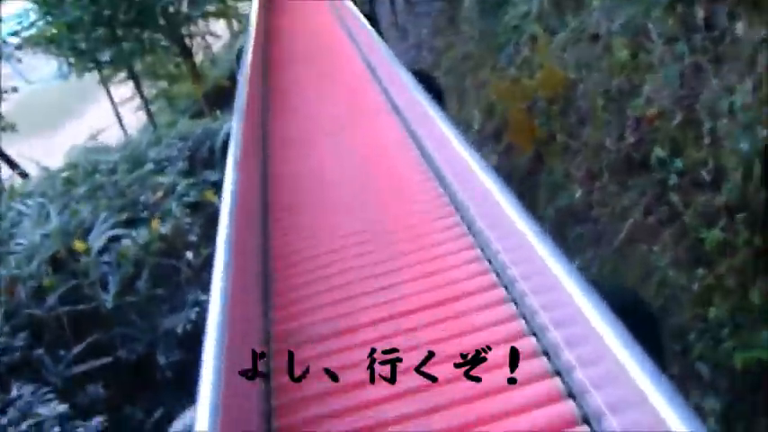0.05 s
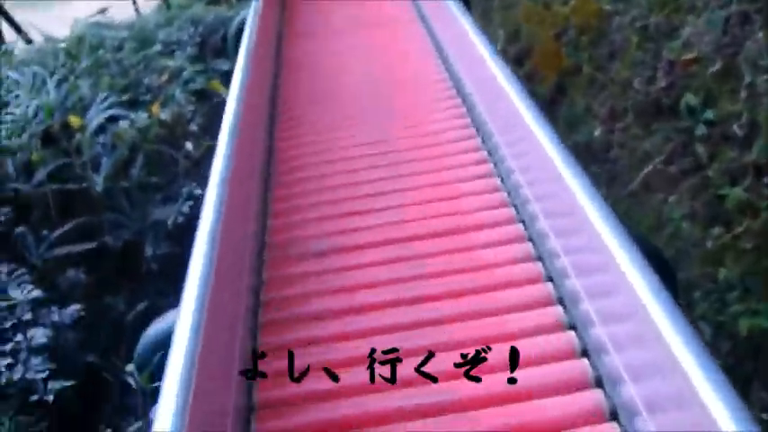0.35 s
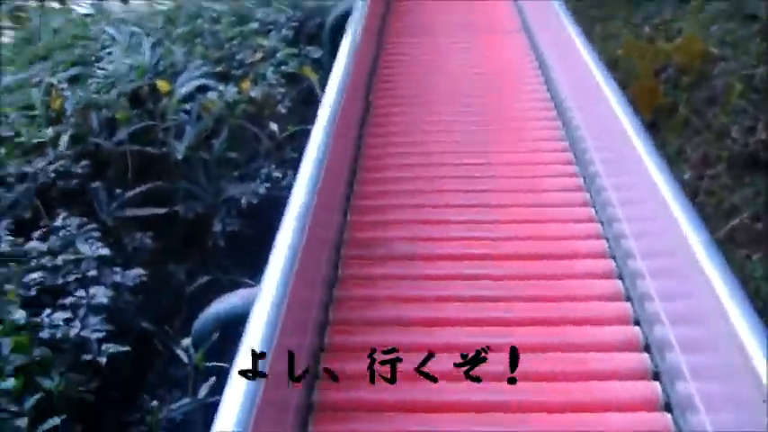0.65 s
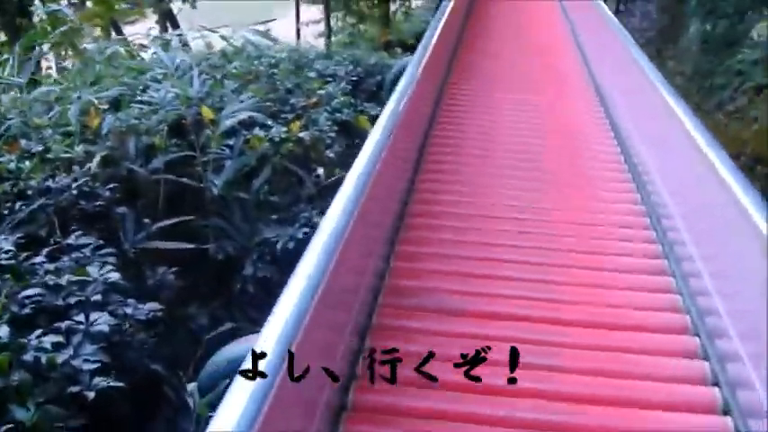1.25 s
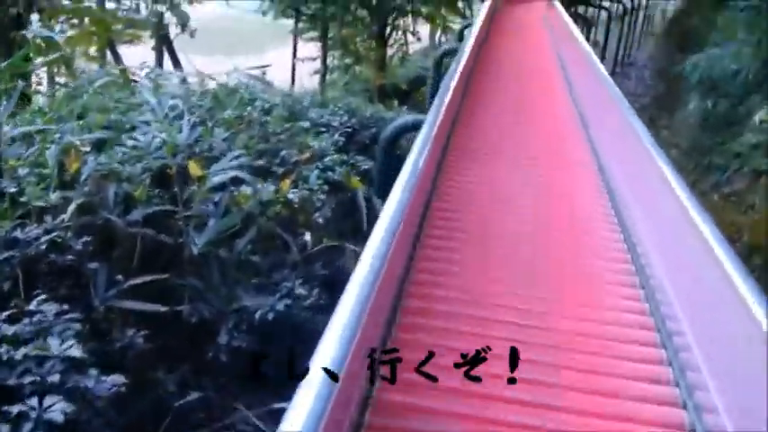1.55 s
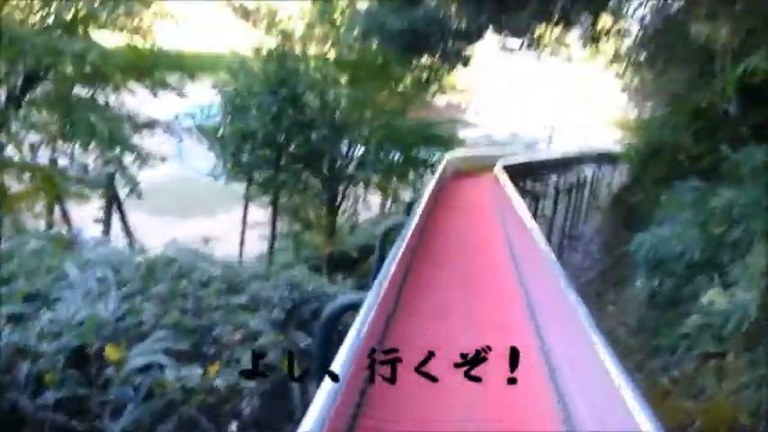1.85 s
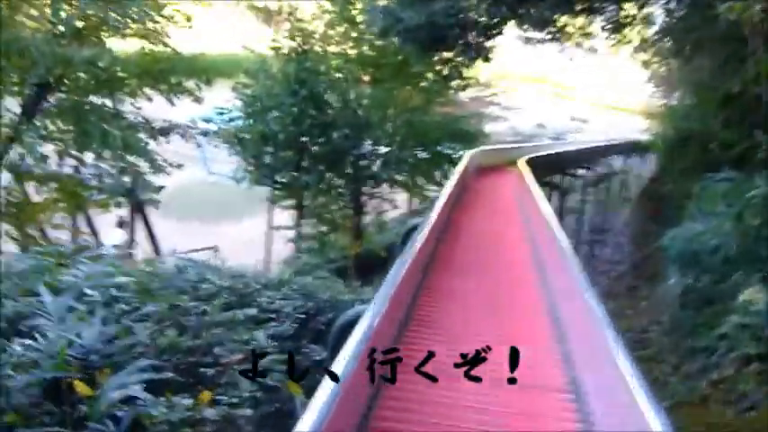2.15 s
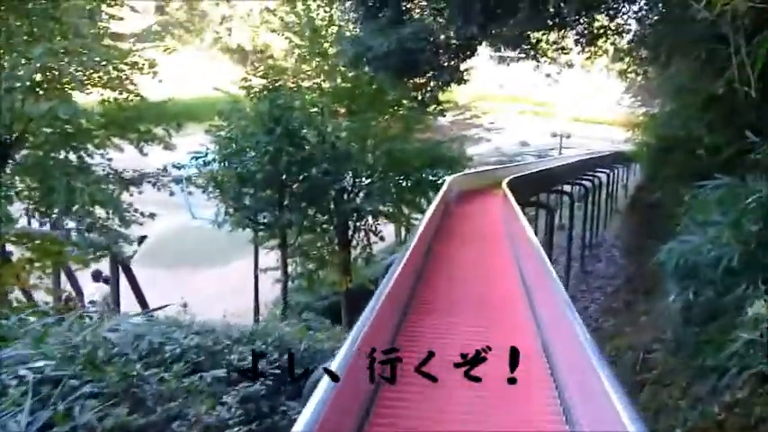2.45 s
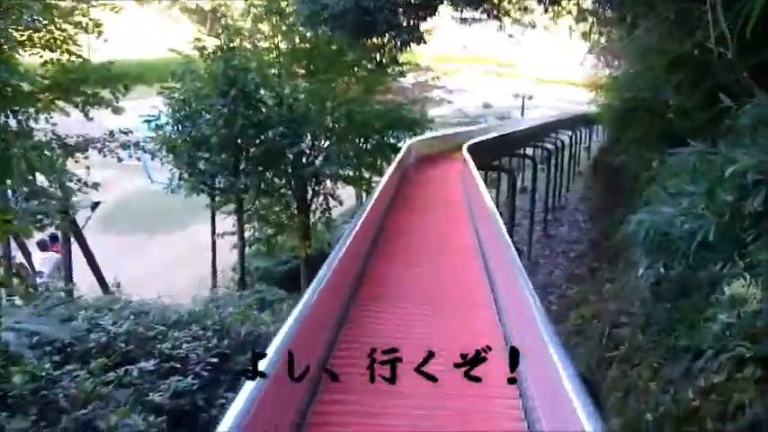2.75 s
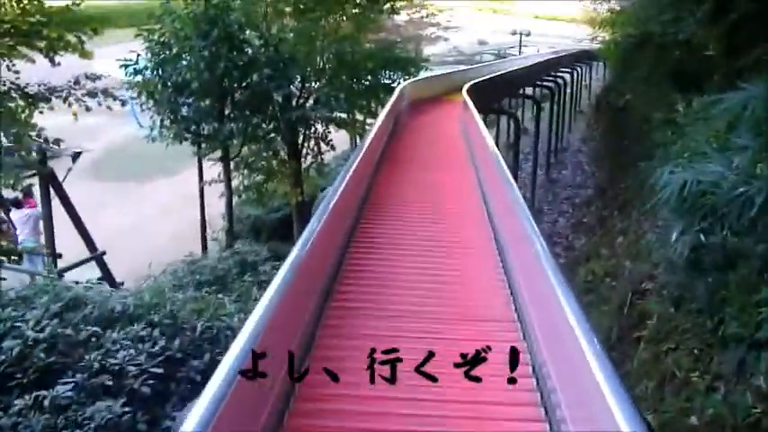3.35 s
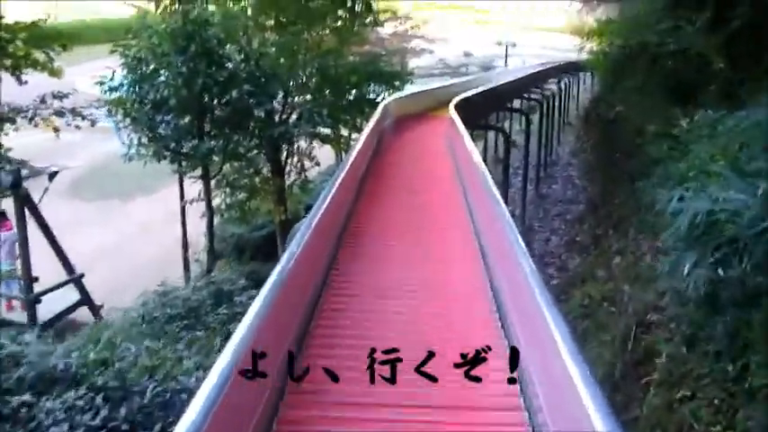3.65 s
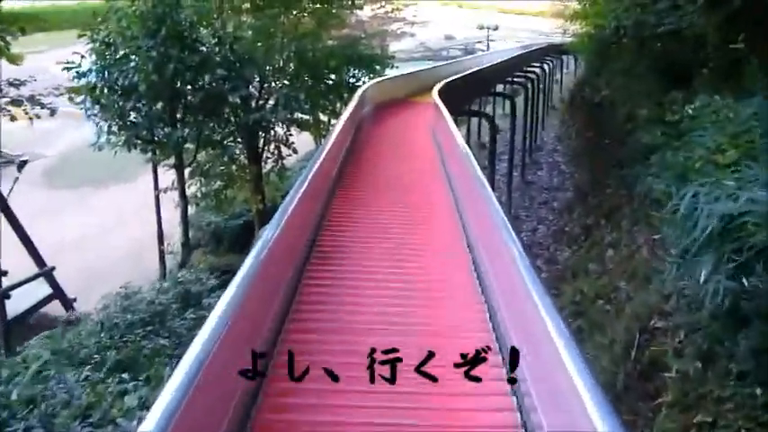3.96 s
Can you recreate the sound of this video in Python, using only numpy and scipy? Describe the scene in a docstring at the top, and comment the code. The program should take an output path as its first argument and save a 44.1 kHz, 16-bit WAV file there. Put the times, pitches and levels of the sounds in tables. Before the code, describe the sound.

Loose rollers on a long outdoor slide tick and scrape softly, then spin up under a rider into a loud, steady rumbling chatter. Thumps and sharp clacks cut through, all heard from right above the rollers.

```python
"""Roller slide, close up

A rider shoves off on a long roller slide, gathers speed and coasts, the microphone close to the rollers.
Loose rollers chatter on their axles: hollow rumble in the tubes, rattle in the steel frame, bearing fizz.
Shoves and bumps make the chatter surge; single rollers knock hard. Faint outdoor air lies underneath."""
import sys
import numpy as np
from scipy import signal
from scipy.fft import rfft, irfft, next_fast_len
from scipy.io import wavfile
from scipy.ndimage import uniform_filter1d, minimum_filter1d, map_coordinates

SR = 44100
rng = np.random.default_rng(int(sys.argv[2]) if len(sys.argv) > 2 else 0)


def dump_mix(stems):
    """Bounce the given channels to the path in sys.argv[1] as a 16-bit WAV at rate SR."""
    frames = np.atleast_2d(stems).T  # one column per channel
    limited = np.clip(frames, -1, 1)  # hard clip at full scale
    pcm = np.round(limited * 32767).astype(np.int16)
    wavfile.write(sys.argv[1], SR, pcm)


N = 176400

# Steady rolling. Each row: time in seconds, then relative rumble, rattle and fizz in dB.
ROLLING = [(0, -51, -42.5, -51.5), (.35, -73, -66, -74), (.395, -61, -74, -67), (.43, -48, -44, -59),
           (.57, -49, -47.5, -47), (.72, -50.5, -47, -55), (0.819, -50, -39, -39), (.91, -45, -41, -46),
           (1.03, -39, -40, -54), (1.12, -45.5, -45, -51), (1.2, -43.5, -34.5, -39),
           (1.29, -36.5, -32.5, -34.5), (1.38, -33.5, -34.5, -37.5), (1.45, -30.5, -25.5, -26.5),
           (1.52, -30, -28.5, -32), (1.57, -23.5, -24, -26), (1.68, -25.5, -22, -26.5),
           (1.76, -23.5, -26, -28), (1.97, -24, -24, -31), (2.14, -25, -27, -32.5),
           (2.2, -25.5, -24.5, -29.5), (2.34, -24, -22, -26), (2.44, -23, -26, -30.5),
           (2.52, -22, -23, -29), (2.66, -24.5, -24.5, -30), (2.86, -22.5, -23, -29),
           (3.04, -24.5, -24.5, -26.5), (3.16, -24.5, -26, -29), (3.31, -23.5, -23, -26.5),
           (3.6, -22, -21, -26), (3.7, -24.5, -26, -29), (3.78, -23, -24, -28), (3.835, -25, -27, -29.5),
           (3.88, -25, -23.5, -29.5), (4, -20, -24.5, -26.5)]
# Shoves and bumps. Each row: peak time and length in seconds, then relative rumble, rattle, fizz in dB.
SURGES = [(0.266, 0.0089, -57, -39.5, -54), (0.417, 0.0045, -37, -43, -52), (0.451, 0.018, -46, -41, -44.5),
          (0.504, 0.015, -42, -39, -33), (0.6, 0.014, -40.5, -30.5, -37.5), (0.738, 0.033, -58, -43, -35.5),
          (0.787, 0.018, -37, -35.5, -37.5), (0.845, 0.025, -36, -30, -35), (0.968, 0.023, -36, -34, -36),
          (1.28, 0.016, -40, -36, -44), (1.427, 0.013, -46, -42, -26), (1.486, 0.0056, -24, -20.5, -24),
          (1.545, 0.012, -22, -22.5, -21), (1.604, 0.0079, -24, -32, -20), (1.665, 0.03, -22.5, -34, -22.5),
          (1.714, 0.0063, -18, -21, -19.5), (1.827, 0.0099, -21, -30, -22.5), (1.888, 0.022, -23, -24, -24),
          (1.974, .015, -25, -26, -27), (2.028, 0.044, -32, -24, -28.5), (2.098, 0.013, -24, -24, -23.5),
          (2.181, 0.03, -28, -26, -30.5), (2.301, 0.013, -20, -38, -25.5), (2.467, 0.015, -26, -23.5, -29),
          (2.943, 0.0052, -24, -40, -26), (3.011, 0.0059, -28, -41, -19.5),
          (3.085, 0.04, -24.5, -22.5, -30), (3.124, 0.0062, -20, -15, -19),
          (3.203, 0.0076, -38, -17.5, -26), (3.182, .006, -40, -22, -22.5), (3.301, 0.021, -22.5, -28, -23),
          (3.406, 0.033, -34.5, -28, -26.5), (3.493, 0.0059, -27, -25, -23.5),
          (3.54, 0.0065, -28, -40, -52), (3.759, 0.0061, -23, -49, -50), (3.248, 0.0073, -25, -33, -26),
          (3.96, 0.0047, -34, -36, -39)]
# Resonances of the slide's parts. Each row: centre in Hz, width in Hz, level in dB.
TUBE_MODES = [(157.3, 20, -15.5), (251, 31.4, -4), (271.6, 33, -0.5), (306.5, 57, -3), (360, 133, -6.5),
              (459, 65, -3)]
FRAME_MODES = [(780, 134, 0.5), (990, 186, -3.5), (1232, 148, 1), (1700, 170, -8.5), (2085, 160, 0),
               (2330, 58, -33)]
AXLE_MODES = [(2990, 320, 0.5), (3223, 200, 1.5), (4004, 214, 2.5), (4710, 630, -5.5), (5370, 210, -4.5),
              (5860, 400, -6.5)]
# Broad colour under those resonances. Each row: frequency in Hz, level in dB.
RUMBLE_BED = [(25, -51), (55, -69), (80, -39), (115, -27), (200, -14.5), (400, -12), (600, -15.5),
              (900, -15.5), (2000, -69)]
RATTLE_BED = [(150, -75.5), (450, -12.5), (700, -8.5), (1500, -5), (2400, -12.5), (3200, -12), (6000, -70)]
FIZZ_BED = [(1000, -39), (2200, -2), (2800, -0.5), (5000, -2.5), (7000, -5), (8500, -10), (10000, -16),
            (11500, -26.5)]
# Colour of the outdoor air and of a clack. Each row: frequency in Hz, level in dB.
AIR_COLOUR = [(25, -58), (90, -8.5), (250, -1.5), (500, 4.5), (900, 2), (1800, 3.5), (3000, -0.5),
              (6000, -13), (11000, -16.5)]
CLACK_COLOUR = [(100, -48), (500, -17), (1200, -1), (3500, -1.5), (7000, -6.5), (11000, -11.5)]
# Sharp dry clacks. Each row: start in seconds, relative level in dB, t60 in seconds.
CLACKS = [(0.0275, -20, 0.009), (0.031, -4.5, 0.0082), (0.2605, -25, 0.046), (0.407, -29, 0.027),
          (0.4367, -19, .012), (0.4969, -7.5, 0.011), (.506, -24, .008), (.598, -19, .007),
          (0.6422, -14, 0.013), (0.6474, -15, 0.0082), (0.6748, -17, 0.0087), (1.045, -27, .01),
          (1.223, -29, 0.0064), (1.362, -31, 0.007), (1.547, -13, .014), (1.833, -5, .014),
          (1.887, -10, .012), (1.905, -7, 0.013), (2.293, -15, .014), (2.768, -14, .008), (2.94, -5, .012),
          (2.955, -8, .01), (3.126, -12, .012), (3.206, -2, .012)]
# The rider's weight drops on a tube. Each row: start in seconds, relative level in dB, pitch in Hz.
THUMPS = [(0.367, -32, 310), (0.783, -26, 300), (0.979, -25, 333), (1.452, -6, 284), (1.484, -6, 300),
          (1.823, -11, 293), (1.878, -6, 285), (2.094, -3, 297), (2.163, -6, 291), (3.203, -3, 275)]
# Ringing scrapes. Each row: peak time and length in seconds, centre and width in Hz, level in dB.
SCRAPES = [(0.413, 0.007, 8900, 4000, -39.5), (0.449, 0.021, 8100, 4000, -39.5),
           (0.792, 0.023, 4670, 1500, -34.5), (0.839, 0.018, 960, 350, -31),
           (0.854, 0.022, 2390, 1500, -34.5), (0.985, 0.01, 2100, 300, -33), (0.993, 0.065, 1270, 150, -42),
           (1.09, 0.042, 1470, 90, -48), (1.272, 0.054, 2100, 450, -29), (1.286, 0.022, 5500, 6000, -40.5),
           (1.431, 0.035, 3120, 500, -28), (1.667, 0.054, 3330, 700, -38), (1.68, 0.068, 1230, 250, -26.5),
           (1.909, 0.02, 9600, 900, -38), (2.387, 0.01, 7000, 4000, -31), (3.075, .012, 5770, 900, -26),
           (3.606, 0.0062, 6500, 1800, -25), (3.852, 0.0043, 6260, 1500, -22.5)]
# Hard knocks of one roller. Each row: start in seconds, relative level in dB, pitch factor.
KNOCKS = [(.6485, -22.5, 1.25), (1.222, -14.5, 1.41), (1.305, -18, 1.45), (1.361, -17, 1.4),
          (1.715, -7, 0.97), (1.724, -11, 1.44), (1.829, -7, 1.27), (1.888, -7.5, 1.15),
          (1.974, -6.5, 1.14), (2.066, -12.5, 1.4), (2.17, -10, 0.8), (2.351, -16, 0.87),
          (2.488, -13, 0.91), (3.05, -10.5, 1.44), (3.096, -11, 1.35), (3.1255, -3, 0.95),
          (3.209, -10.5, 0.95), (3.238, -8.5, 0.99), (3.433, -8, 1.04), (3.546, -8, 1.47),
          (3.668, -1, 1.014), (3.718, -13, 0.97), (3.8087, -0.5, 1.026), (3.8875, -11.5, 1.5),
          (3.947, -7.5, 1)]
# A knocked roller's ring. Each row: base pitch in Hz, level in dB, t60 of a full ring in seconds.
KNOCK_MODES = [(772, -5.5, 0.037), (834, 4.5, 0.036), (1032, -9.5, 0.017), (1327, -8, 0.037),
               (1910, -5, 0.02), (2077, -5.5, 0.019)]

RUMBLE, RATTLE, FIZZ = range(3)  # order of the level columns in ROLLING and SURGES


def amp(db):
    """Decibels to gain."""
    return 10 ** (np.asarray(db) / 20)


def unit(x):
    """Scale to rms 1."""
    return x / np.sqrt(np.mean(x ** 2) + 1e-20)


def steady(x, window):
    """Hold the rms near 1 over a sliding window of samples."""
    return x / np.sqrt(np.abs(uniform_filter1d(x ** 2, window)) + 1e-12)


def colour(points, f):
    """Gain of (Hz, dB) points on a log axis."""
    hz, db = np.transpose(points)
    return amp(np.interp(np.log(f + 1), np.log(hz), db))


def resonance(hz, width, db, f):
    """Gain of one steep-sided resonance."""
    detuning = (hz * hz - f * f) / (1.5 * width * (f + 1))
    return amp(db) / (1 + detuning ** 2)


def filtered(x, response):
    """Shape x by a gain over frequency."""
    size = next_fast_len(N + SR // 2)
    return irfft(rfft(x, size) * response(np.fft.rfftfreq(size, 1 / SR)), size)[:N]


def impulse_response(gain, size=4096):
    """Causal ringing of a body with the given gain over frequency."""
    cepstrum = irfft(np.log(gain(np.fft.rfftfreq(size, 1 / SR)) + 1e-5))
    cepstrum[1:size // 2] *= 2  # fold to minimum phase
    cepstrum[size // 2 + 1:] = 0
    return irfft(np.exp(rfft(cepstrum)))


def wobble(knots_per_s):
    """A smooth random curve."""
    knots = rng.standard_normal(4000)
    return map_coordinates(knots, [np.arange(N) * knots_per_s / SR], mode="mirror")


def add(track, start, sound):
    """Mix a sound in at a start in seconds."""
    i = max(0, round(start * SR))
    track[i:i + len(sound)] += sound[:max(0, N - i)]


def outdoor_air(level_db=-45.5):
    """Faint, even noise of the open air around the slide."""
    return amp(level_db) * unit(filtered(rng.standard_normal(N), lambda f: colour(AIR_COLOUR, f)))


def load(part, rise=.55, fall=1.05):
    """Strength of one part: steady rolling plus surges that swell quickly and ebb more slowly."""
    t, rolling = np.arange(N) / SR, np.array(ROLLING)
    power = amp(np.interp(t, rolling[:, 0], rolling[:, part + 1])) ** 2
    for peak, length, *db in SURGES:
        width = length * np.where(t < peak, rise, fall)
        power += amp(db[part]) ** 2 * np.exp(-((t - peak) / width) ** 2)
    return np.sqrt(power)


def chatter(modes, bed, contacts_per_s, spread_db, sway_db):
    """Tiny uneven impacts ring one part; its resonances take turns as new rollers come under load."""
    def ring(gain):
        hits = (rng.random(N) < contacts_per_s / SR) * rng.choice([-1, 1], N)
        sizes = amp(spread_db * rng.standard_normal(N))
        return signal.oaconvolve(steady(hits * sizes, SR // 25), impulse_response(gain))[:N]

    body = ring(lambda f: colour(bed, f))
    for mode in modes:
        body += ring(lambda f: resonance(*mode, f)) * unit(amp(sway_db * wobble(knots_per_s=32)))
    return steady(body, SR // 24)


def rollers(rumble_db=-1.06, full_speed_s=1.23, bright_db=12, bright_hz=9000, flutter_db=0.86):
    """Tubes, frame and bearings shake under the rider's uneven load."""
    tubes = chatter(TUBE_MODES, RUMBLE_BED, contacts_per_s=1500, spread_db=3.5, sway_db=1.2)
    frame = chatter(FRAME_MODES, RATTLE_BED, contacts_per_s=1500, spread_db=2.5, sway_db=2.8)
    bearings = chatter(AXLE_MODES, FIZZ_BED, contacts_per_s=3800, spread_db=3, sway_db=3.2)
    rumble = amp(rumble_db) * load(RUMBLE) * tubes
    rattle = load(RATTLE) * frame
    fizz = load(FIZZ) * bearings
    # Slow, light scuffs are brighter than full rolling.
    slow = np.clip(1 - np.arange(N) / SR / full_speed_s, 0, 1)
    fizz += slow * amp(bright_db) * filtered(fizz, lambda f: f ** 6 / (f ** 6 + bright_hz ** 6))
    return (rumble + rattle + fizz) * amp(flutter_db * wobble(knots_per_s=51))


def axle_ticks(per_s=110, low_hz=2845, high_hz=7180, t60=.011, range_db=19, loss_db=8, level_db=-11.5):
    """Loose axles tick in clusters of three bounces, each cluster at its own pitch, louder under load."""
    out, t = np.zeros(N), np.arange(SR // 40) / SR
    for when, pitch, size, pace in rng.random((int(per_s * N / SR), 4)):
        hz = low_hz * (high_hz / low_hz) ** pitch
        gap_s = .003 + .006 * pace
        for bounce in range(3):
            phase_drift = .14 * np.cumsum(rng.standard_normal(len(t)))
            fade = amp(range_db * size - loss_db * bounce - 60 * t / t60)
            add(out, when * N / SR + bounce * gap_s, fade * np.sin(2 * np.pi * hz * t + phase_drift))
    return amp(level_db) * load(FIZZ) * unit(out)


def tube_boom(hz, attack_s=0.0071, t60=0.085):
    """A hollow tube booms briefly under one soft blow."""
    t = np.arange(SR // 8) / SR
    fade = amp(-60 * t / t60) * (1 - np.exp(-t / attack_s))
    return fade * np.sin(2 * np.pi * hz * t)


def drumming(per_s=26, centre_hz=290.1, pitch_spread=0.118, spread_db=2, level_db=-7.5):
    """Tube after tube takes the weight in a quick, uneven drumming."""
    out = np.zeros(N)
    for k, (late, pitch, size) in enumerate(rng.standard_normal((int(per_s * N / SR), 3))):
        boom = tube_boom(centre_hz * np.exp(pitch_spread * pitch))
        add(out, (k + .3 * late) / per_s, amp(spread_db * size) * boom)
    return amp(level_db) * load(RUMBLE) * unit(out)


def clacks(attack_s=.0004, tail_db=-23, tail_t60=0.082, level_db=-1):
    """Dry clicks as rollers take the weight."""
    out, t = np.zeros(N), np.arange(SR // 10) / SR
    attack = 1 - np.exp(-t / attack_s)
    for start, db, t60 in CLACKS:
        fade = amp(-60 * t / t60) + amp(tail_db - 60 * t / tail_t60)
        add(out, start, amp(db + level_db) * rng.standard_normal(len(t)) * attack * fade)
    return filtered(out, lambda f: colour(CLACK_COLOUR, f))


def thumps(level_db=-1):
    """The rider's weight drops on single tubes."""
    out = np.zeros(N)
    for start, db, hz in THUMPS:
        add(out, start, amp(db + level_db) * tube_boom(hz))
    return out


def scrapes():
    """Rubbing on the rails and dry axles rings in one band for a moment."""
    out, t = np.zeros(N), np.arange(N) / SR
    for peak, length, hz, width, db in SCRAPES:
        ring = unit(filtered(rng.standard_normal(N), lambda f: resonance(hz, width, 0, f)))
        out += amp(db) * ring * np.exp(-((t - peak) / length) ** 2)
    return out


def knocks(attack_s=.001, crack_db=-13, crack_t60=0.011, full_ring_db=-1.5, spread_db=1.5, low_hz=300):
    """A roller slams against its axle and rings very briefly; it is too small to radiate much bass."""
    out, t = np.zeros(N), np.arange(SR // 10) / SR
    for start, db, pitch in KNOCKS:
        ring_share = .5 + .5 * min(1, amp(db - full_ring_db))  # weak knocks are drier
        ring = np.zeros(len(t))
        for hz, mode_db, t60 in KNOCK_MODES:
            fade = amp(mode_db + rng.normal(0, spread_db) - 60 * t / (t60 * ring_share))
            ring += fade * np.sin(2 * np.pi * hz * pitch * t)
        crack = amp(crack_db - 60 * t / crack_t60) * rng.standard_normal(len(t))
        hit = (ring + crack) * (1 - np.exp(-t / attack_s))
        add(out, start, amp(db) * hit / np.abs(hit).max())
    return signal.sosfilt(signal.butter(2, low_hz, "high", fs=SR, output="sos"), out)


def scatter(slide, t60=0.051, level_db=-15.5):
    """Brief reflections reach the microphone from the slide's walls and the slope."""
    t = np.arange(SR // 4) / SR
    tail = rng.standard_normal(len(t)) * amp(-60 * t / t60)
    return amp(level_db) * signal.fftconvolve(slide, tail / np.linalg.norm(tail))[:N]


def scene():
    """The slide close up in mono, with its scatter and the open air behind."""
    slide = rollers() + axle_ticks() + drumming() + thumps() + knocks() + clacks() + scrapes()
    return (slide + scatter(slide) + outdoor_air())[None]


def record(dry, limit_db=-2.5, hold_s=0.029, top_hz=11130):
    """Behind the microphone, a limiter ducks after the hardest knocks and a steep filter cuts the top."""
    mic, hold = dry[0], int(hold_s * SR) | 1
    needed = np.minimum(1, amp(limit_db) / (np.abs(mic) + 1e-9))
    held = minimum_filter1d(needed, hold, origin=hold // 2)
    limited = mic * uniform_filter1d(held, size=64)
    return filtered(limited, lambda f: 1 / np.sqrt(1 + (f / top_hz) ** 240))[None]


dry = scene()
out = record(dry)
dump_mix(out)
```